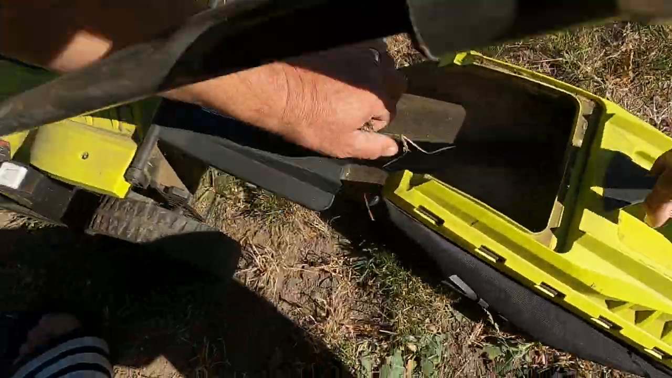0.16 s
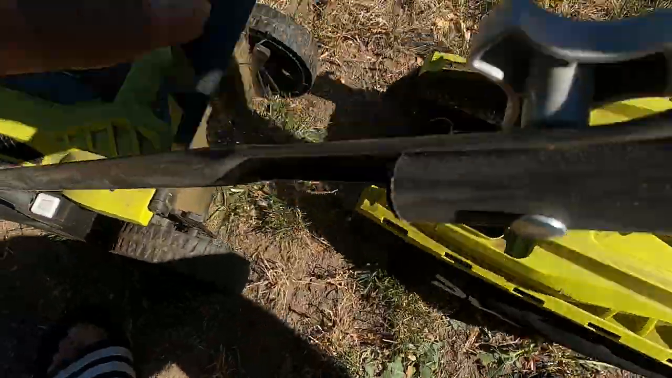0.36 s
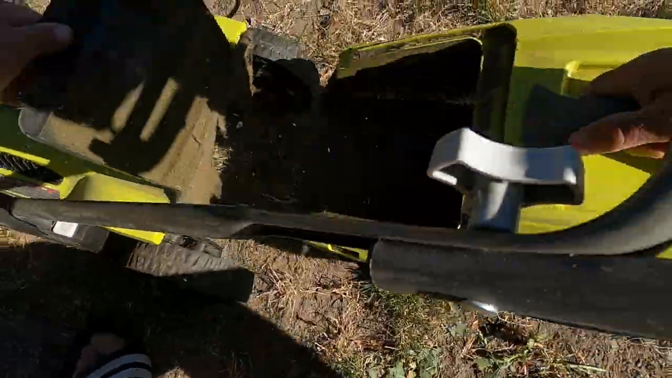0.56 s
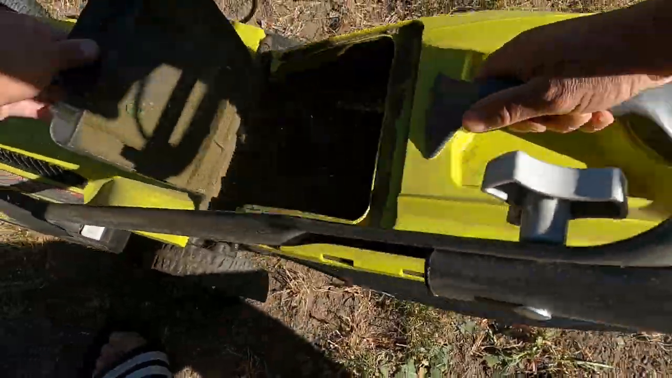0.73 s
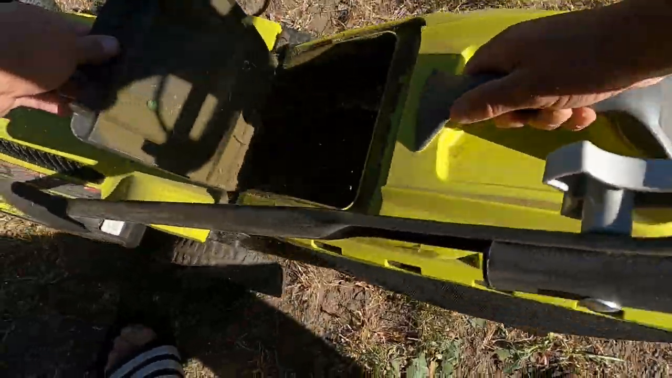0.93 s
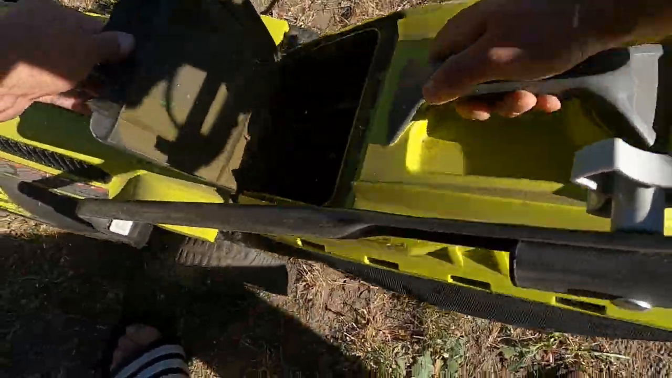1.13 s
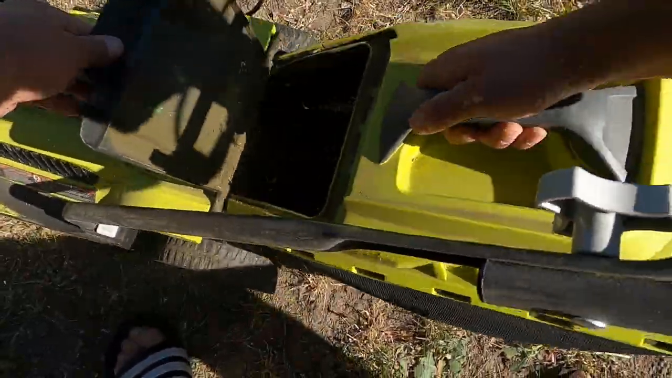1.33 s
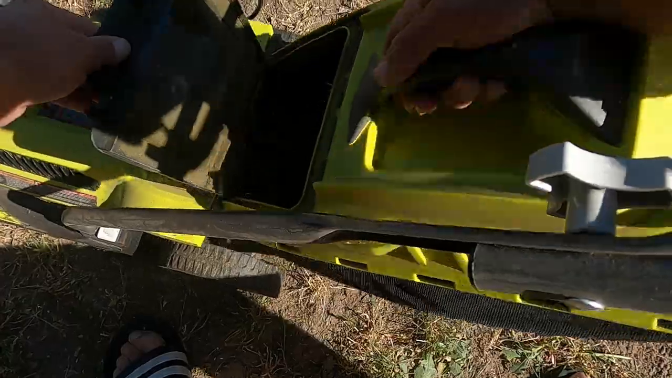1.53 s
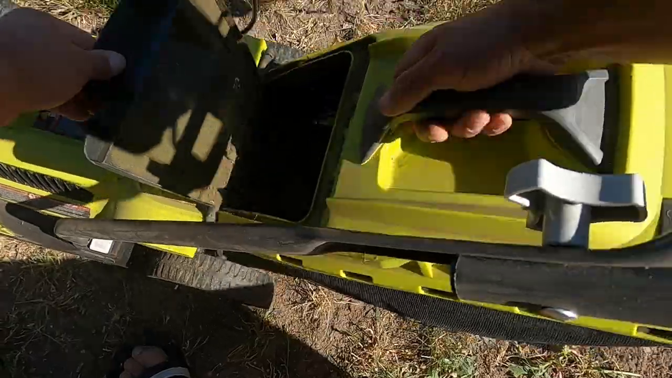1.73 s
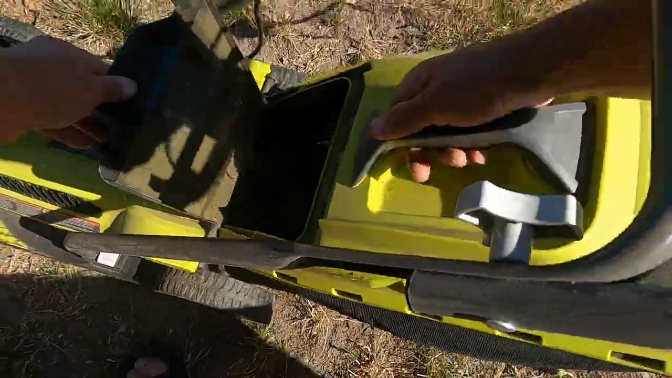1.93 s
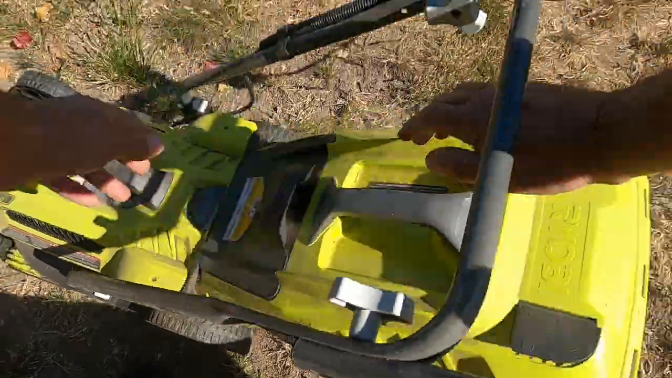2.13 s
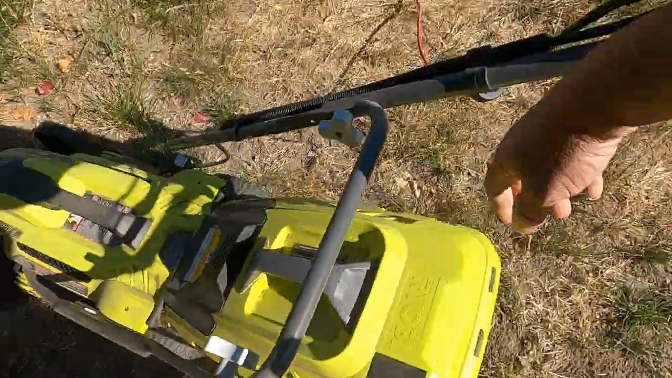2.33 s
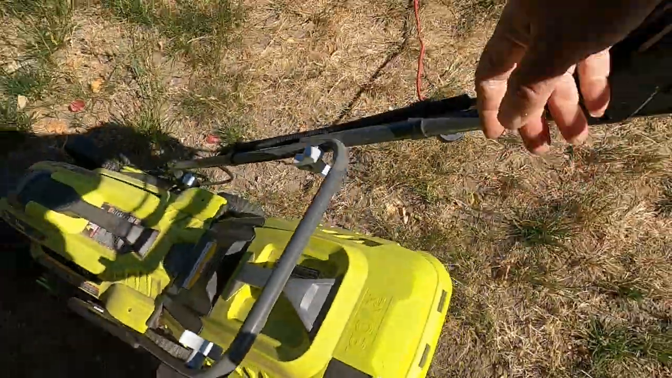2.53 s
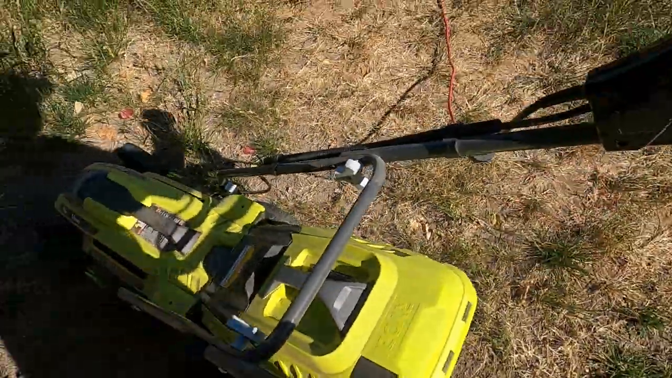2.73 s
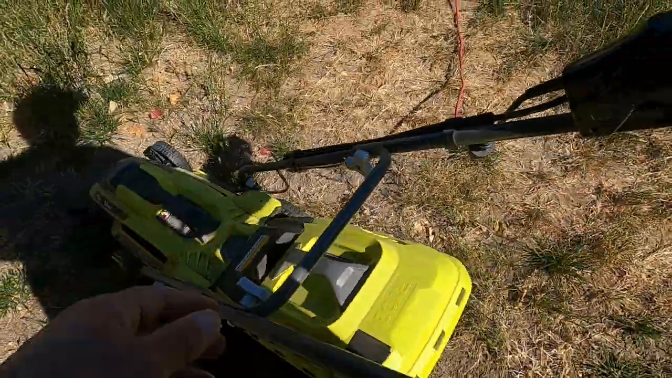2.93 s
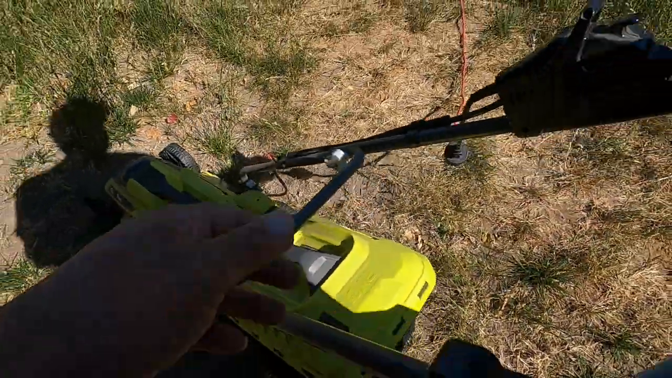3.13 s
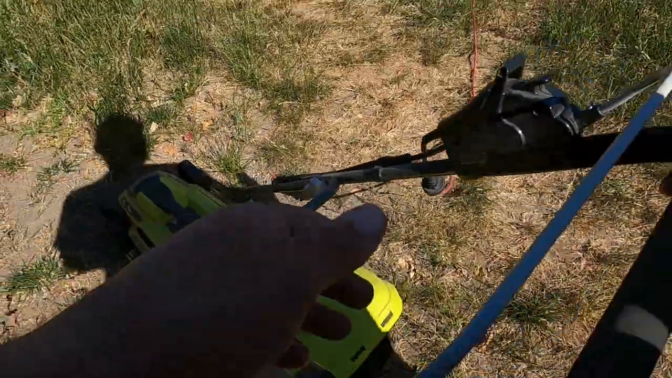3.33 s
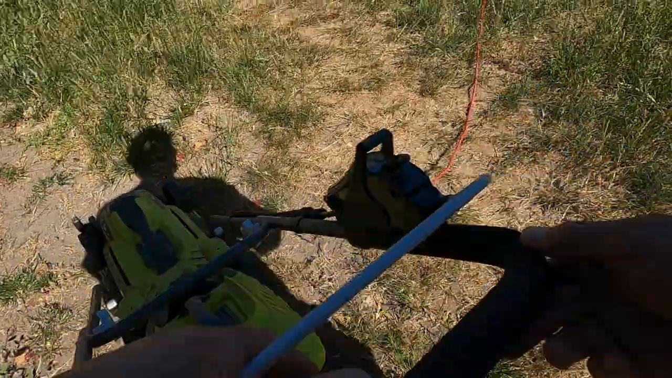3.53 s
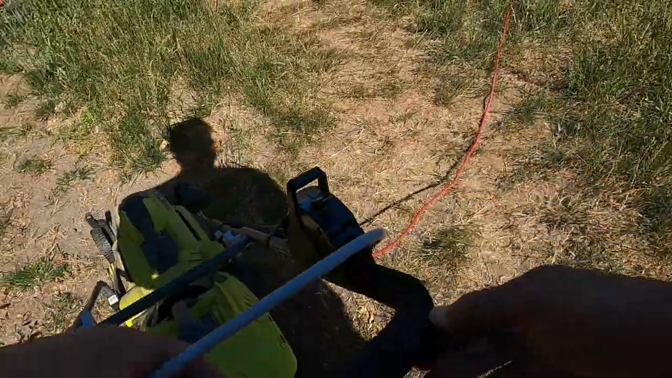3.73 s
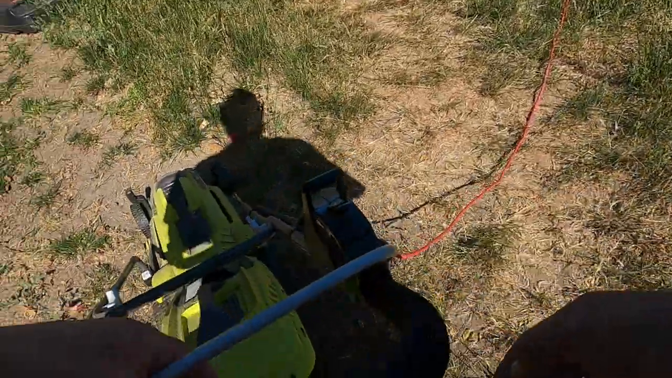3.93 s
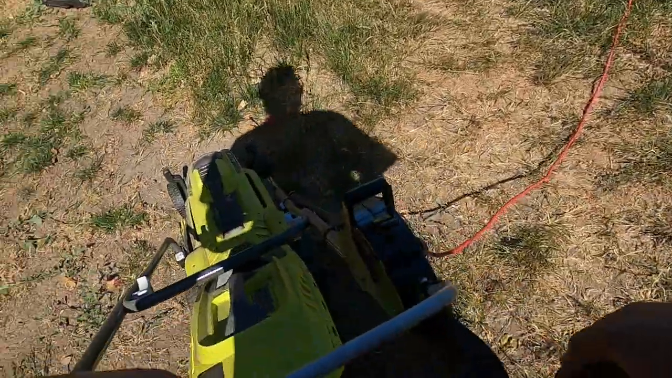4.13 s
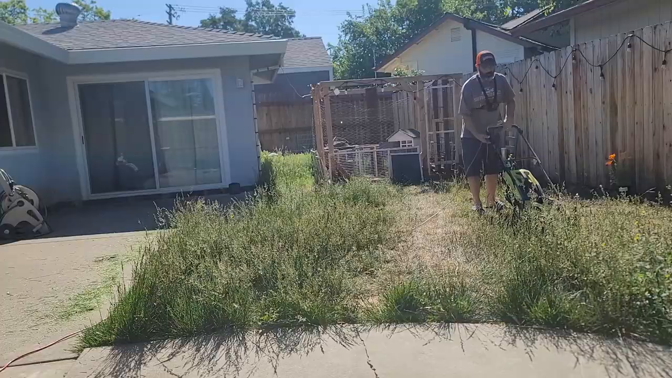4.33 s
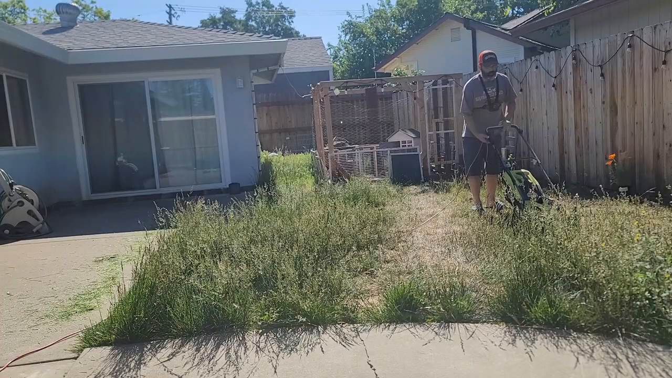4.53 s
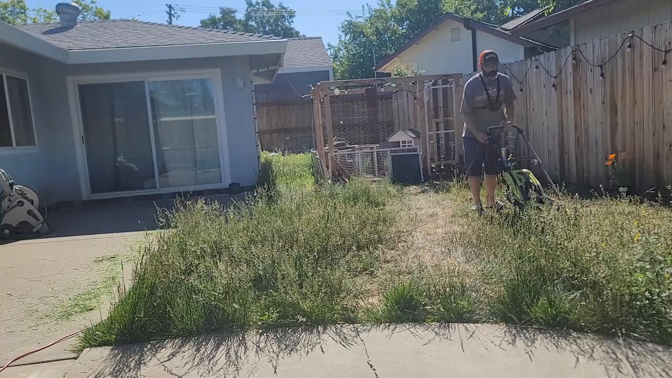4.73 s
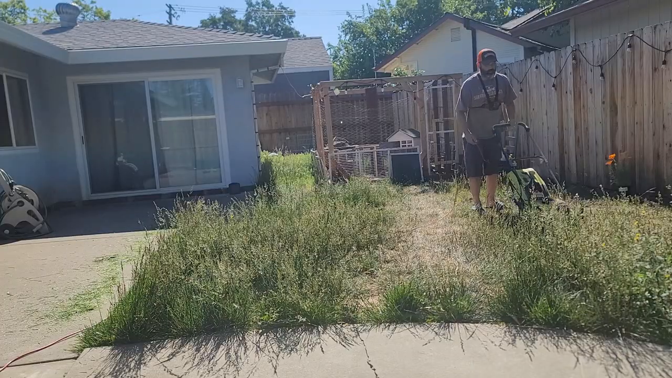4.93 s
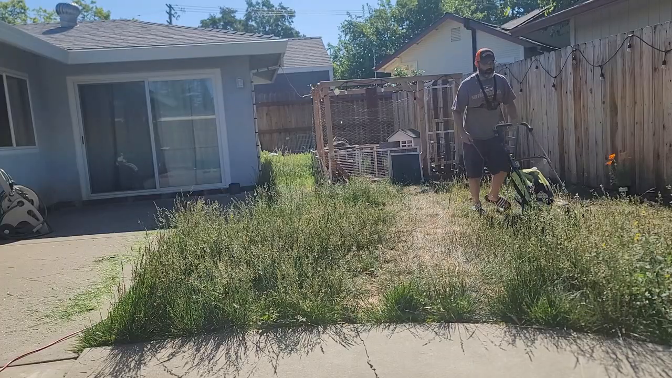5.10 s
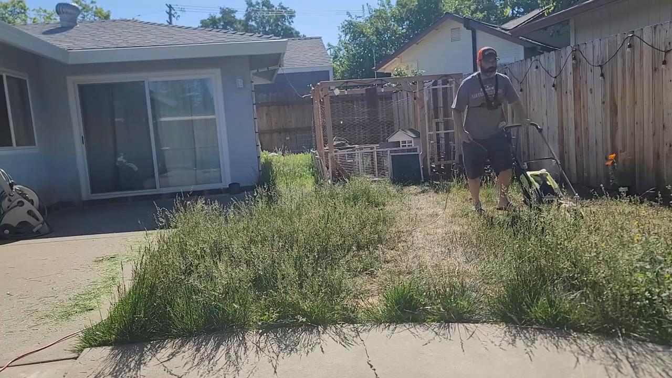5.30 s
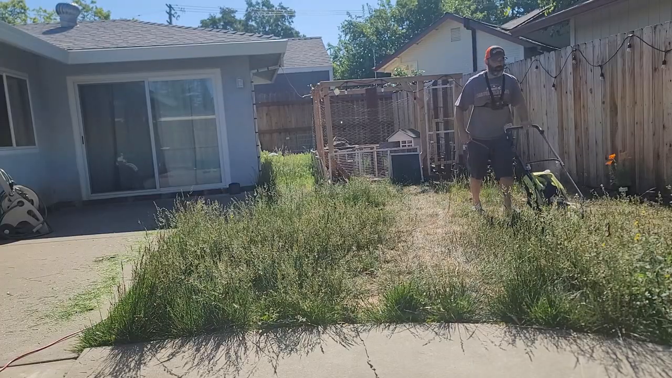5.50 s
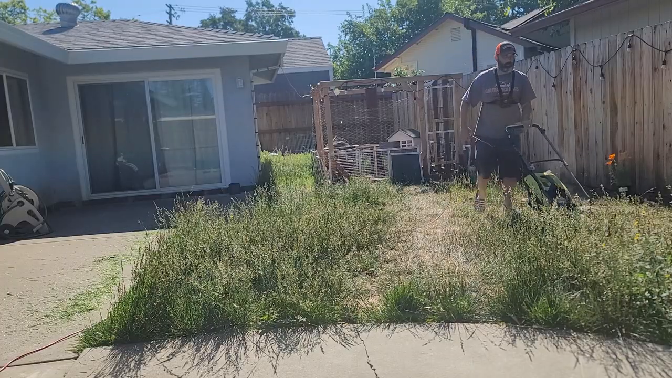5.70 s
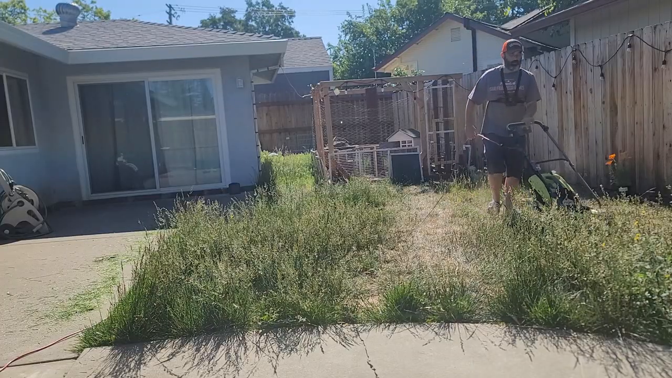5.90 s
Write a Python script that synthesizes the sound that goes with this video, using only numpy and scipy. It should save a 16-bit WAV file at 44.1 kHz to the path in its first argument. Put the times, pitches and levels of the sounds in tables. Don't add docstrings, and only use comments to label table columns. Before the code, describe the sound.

Close plastic rubbing, squeaks and boxy thuds, a hard clack, quiet rustling, then an electric mower spins up fast into a throbbing, airy drone.

```python
import sys
import numpy as np
from scipy import signal
from scipy.fft import rfft, irfft, next_fast_len
from scipy.io import wavfile
from scipy.ndimage import map_coordinates

SR = 44100
rng = np.random.default_rng(int(sys.argv[2]) if len(sys.argv) > 2 else 0)


def materialize(psi):
    bounded = np.clip(np.atleast_2d(psi).T, -1, 1)
    quanta = np.round(bounded * 32767).astype(np.int16)
    wavfile.write(sys.argv[1], SR, quanta)


def undo_db(level):
    steps = np.asarray(level, float) / 20
    return 10 ** steps


N = 262836
SWITCH_S, FULL_HZ = 4.288, 109.575

# f/Hz, density/dB
HOLLOW_AIR = [(53, -30), (90, -11), (135, 0), (387, -1), (437, -6), (484, -1.5), (700, -17), (910, -50.5),
              (1540, -120)]
# f/Hz, coherence/1
NEAR_COHERENCE = [(60, 1), (180, 0.99), (550, 0.93), (1650, 0.62), (4970, 0.4), (15000, 0.04)]


def unit(x):
    return x / np.sqrt(np.mean(x ** 2) + 1e-20)


def along(points, hz):
    f, v = np.transpose(points)
    return np.interp(np.log(hz + 1), np.log(f + 1), v)


def wobble(rate):
    knots = rng.standard_normal(int(N * rate / SR) + 4)
    return map_coordinates(knots, [np.arange(N) * rate / SR])


def between(t0, t1, fade):
    t = np.arange(N) / SR
    return np.clip(np.minimum(t - t0, t1 - t) / fade, 0, 1)


def filtered(x, response):
    m = next_fast_len(x.shape[-1] + 4096)
    spectrum = rfft(x, m) * response(np.fft.rfftfreq(m, 1 / SR))
    return irfft(spectrum, m)[..., :x.shape[-1]]


def peak(f, centre_hz, width_hz):
    return 1j * f * width_hz / (centre_hz ** 2 - f * f + 1j * f * width_hz)


def rush(spectrum, coherence, grain_db, grain_rate):
    pair = rng.standard_normal((2, N)) * undo_db(grain_db * wobble(grain_rate))

    def mid_side(hz):
        angle = np.arccos(np.clip(along(coherence, hz), -1, 1)) / 2
        return undo_db(along(spectrum, hz)) * [np.cos(angle), np.sin(angle)]

    mid, side = filtered(pair, mid_side)
    return unit(np.array([mid + side, mid - side]))


def tone(hz, smear_db, smear_rate):
    phase = 2 * np.pi * np.cumsum(hz * np.ones(N)) / SR + smear_db / 6 * wobble(smear_rate)
    return unit(undo_db(smear_db * wobble(smear_rate)) * np.sin(phase))


def whistle(centre_hz, width_hz):
    return unit(filtered(rng.standard_normal(N), lambda f: peak(f, centre_hz, width_hz) ** 2))


def place(out, s, sound):
    out[:, round(s * SR):][:, :sound.shape[1]] += sound


def yard():
    # f/Hz, density/dB
    ambient = [(20, -12), (60, -0.5), (150, -6), (400, -24), (1000, -21.5), (3000, -32.5), (8000, -64),
               (15000, -77.5)]
    drone_level = undo_db(-68) + undo_db(-58) * between(3.62, 4.35, fade=0.1)
    drone = tone(538, smear_db=1, smear_rate=24) * drone_level
    return undo_db(-49) * rush(ambient, NEAR_COHERENCE, grain_db=1.5, grain_rate=14) + drone


def swells(rows):
    s, rise, fall, db = np.transpose(rows)[:, :, None]
    t = np.arange(0, N / SR + .002, .001)
    slopes = np.maximum((s - t) / abs(rise), (t - s) / abs(fall))
    power = undo_db(2 * (db - 20 * slopes)).sum(axis=0)
    return np.interp(np.arange(N) / SR, t, 10 * np.log10(power + 1e-12))


def rubbing(over_db, bright_share):
    # t/s of the peak, rise/s, fall/s, drag level/dB, brightness/dB
    drags = [(0.0, .1, 0.19, -35.5, 5), (0.15, 0.2, 0.63, -48.5, 14.5), (0.284, 0.27, 0.82, -39, -5),
             (0.414, 0.19, 0.15, -39, 14.5), (0.514, 0.13, 0.14, -30.5, 2), (0.898, 0.11, 0.074, -26, -2),
             (1.0, 0.14, 0.15, -44.5, 5), (1.122, 0.16, 0.23, -27.5, -6.5), (1.192, .1, 0.074, -33.5, 2),
             (1.367, 0.17, 0.12, -31.5, -2), (1.571, 0.065, 0.077, -31, 5), (1.72, 0.43, 0.24, -33.5, -1),
             (2.055, 0.17, 0.39, -39.5, 4), (2.163, 0.044, 0.044, -46, 19.5), (2.23, 0.074, 0.14, -37, 8),
             (2.33, 0.33, 0.16, -44.5, 10), (2.42, .15, .3, -60, 22), (3.01, .08, .08, -56, 14),
             (.58, 0.026, .06, -50.5, 14), (.68, 0.17, 0.28, -51.5, 10.5), (2.111, .15, .08, -49.5, 19.5),
             (2.79, 0.13, 0.13, -61, 9), (2.962, .05, 0.044, -57, 18), (2.715, 0.044, 0.053, -61.5, 19),
             (2.88, 0.066, 0.12, -56, 19), (3.11, 0.31, 0.33, -50, 14.5), (3.522, 0.22, 0.14, -48, 12),
             (3.76, 0.12, 0.12, -62.5, 21), (3.693, 0.19, 0.14, -43.5, 7), (3.9, .3, 0.55, -52, -9.5),
             (4.115, 0.068, 0.068, -43.5, 21.5), (4.265, 0.3, 0.067, -48.5, 10)]
    strokes = [(s, rise, fall, db + over_db + bright_share * bright_db)
               for s, rise, fall, db, bright_db in drags]
    rest = (2, 99, 99, -69 + over_db / 2)
    return swells(strokes + [rest])


def squeaks():
    # start t/s, length/s, f/Hz, width/Hz, level/dB
    singing = [(0.441, 0.13, 900, 200, -42), (0.522, 0.15, 1042, 200, -46), (0.548, 0.21, 780, 150, -49.5),
               (.64, 0.18, 1013, 220, -53), (0.32, .18, 3440, 1000, -47.5), (.56, 0.14, 2280, 260, -53.5),
               (.67, 0.15, 2310, 330, -57), (.62, .07, 2950, 400, -53), (0.92, 0.13, 2230, 300, -63),
               (2.013, 0.14, 476.6, 150, -41.5), (2.017, 0.11, 3290, 900, -51.5),
               (2.15, 0.02, 1970, 150, -36), (2.168, 0.016, 532, 150, -25), (2.181, 0.017, 900, 200, -33),
               (2.95, 0.76, 2340, 800, -58), (3.206, 0.37, 850, 520, -54.5), (3.15, .4, 1500, 800, -64)]
    out = 0
    for s, length, hz, width_hz, db in singing:
        band = filtered(rng.standard_normal((2, N)), lambda f: 1 / (1 + (2 * f / width_hz) ** 4))
        phase = 2 * np.pi * np.cumsum(hz * (1 + .025 * wobble(12))) / SR
        voice = unit(band[0] * np.sin(phase) + band[1] * np.cos(phase))
        gate = between(s, s + length, fade=min(.022, length / 2))
        out = out + undo_db(db + 1.7 * wobble(30.03)) * voice * gate
    return out


def handling():
    # f/Hz, density/dB
    shell_spectrum = [(360, -44), (620, -9.5), (800, -6), (1050, -7), (1370, -8.5), (1700, -11.5),
                      (2200, -50), (3700, -120)]
    scrape_spectrum = [(1000, -29), (1700, -2), (2400, -2), (2850, -2), (3500, -4), (4600, -7), (6000, -44),
                       (10000, -120)]
    fizz_spectrum = [(2590, -29), (4400, -6.5), (4950, -4), (6860, -7), (8630, -10), (11500, -20.5),
                     (15800, -33.5)]
    buffet_spectrum = [(8.8, -33), (15, -2), (55, -3.5), (102, -10.5), (130, -24.5), (160, -38.5),
                       (210, -66), (350, -120)]
    # t/s of the peak, rise/s, fall/s, level/dB
    jolts = [
        (0.0, .1, .5, -51),
        (0.5, 1.6, .5, -52),
        (0.858, 0.068, 0.21, -36),
        (1.117, 0.05, 0.092, -34),
        (1.591, 0.069, 0.066, -28),
        (1.7, .1, 1.2, -54),
        (2.205, 0.055, 0.75, -34),
        (3.617, 0.05, 0.11, -27.5),
        (4.0, 1.7, 1.4, -51.5),
    ]
    hollow_db = rubbing(over_db=0, bright_share=0.05)
    shell_db = rubbing(over_db=-12.5, bright_share=0.79)
    scrape_db = rubbing(over_db=-15, bright_share=0.91)
    fizz_db = rubbing(over_db=-26.5, bright_share=1.13)
    slip = wobble(35)
    rub = undo_db(hollow_db + 0.5 + 2.0 * slip) * rush(HOLLOW_AIR, NEAR_COHERENCE, grain_db=3.5, grain_rate=60)
    rub += undo_db(shell_db - 0.3 + 1.1 * slip) * rush(shell_spectrum, NEAR_COHERENCE, grain_db=2.5, grain_rate=130)
    rub += undo_db(scrape_db - 0.2 + 1.0 * slip) * rush(scrape_spectrum, NEAR_COHERENCE, grain_db=3, grain_rate=260)
    rub += undo_db(fizz_db + 4.5 + .4 * slip) * rush(fizz_spectrum, NEAR_COHERENCE, grain_db=3.2, grain_rate=320)
    rub += squeaks()
    leeward = undo_db([[-16], [3]] * between(3.5, 3.85, fade=.08))
    buffet = rush(buffet_spectrum, [(30, 0.83)], grain_db=3.5, grain_rate=22)
    rub += undo_db(swells(jolts) + 4.0) * leeward * buffet
    return rub * between(-1, 4.33, fade=0.028)


def thuds():
    # t/s, peak level/dB, f/Hz, T60/s
    blows = [(0.0, -15, 343, 0.025), (2.206, -16, 102.6, 0.26), (0.207, -30.5, 266, 0.099),
             (0.363, -23.5, 244, 0.05), (0.389, -25, 345, 0.083), (0.472, -22, 186, 0.082),
             (0.569, -27.5, 128, 0.36), (0.819, -6.5, 252, 0.064), (0.8215, -7, 349, 0.058),
             (.8935, -6.5, 300, 0.03), (.982, -34, 300, .05), (0.874, -21, 403, 0.08),
             (0.887, -10, 181, 0.067), (0.909, -13, 148.3, 0.14), (1.049, -24, 314, 0.1),
             (1.084, -14.5, 173, 0.032), (1.115, -15.5, 226, 0.047), (1.178, -17, 142.3, 0.14),
             (1.323, -15.5, 378, 0.043), (1.358, -11, 380, 0.016), (1.382, -21.5, 268, 0.089),
             (1.552, -15, 143.5, 0.043), (1.7935, -5.5, 399, 0.018), (1.84, -15.5, 417, 0.029),
             (1.914, -25, 206, 0.059), (2.036, -23, 364, 0.035), (2.175, -19.5, 190, 0.12),
             (2.199, -6, 189, 0.04), (2.2018, -7, 285, 0.035), (2.211, -15, 175, .06),
             (2.235, -18, 230, 0.039), (2.331, -28.5, 144, 0.081), (3.648, -27.5, 152, 0.09),
             (4.303, -27, 142, 0.07), (.021, -28, 330, .06), (.145, -30, 230, .03), (.281, -26, 260, .025),
             (2.364, -33, 230, .035), (2.408, -34, 130, .04), (2.518, -38, 210, .03)]
    out = np.zeros((2, N + SR))
    t = np.arange(SR // 4) / SR
    for s, db, hz, t60 in blows:
        decay = undo_db(-60 * t / np.clip(t60, .015, .3))
        shape = decay * (1 - np.exp(-t * hz / 0.5))
        ring = np.sin(2 * np.pi * hz * t)
        ring += 0.21 * np.sin(2 * np.pi * 2.05 * hz * t)
        ring += 0.26 * np.sin(2 * np.pi * 0.543 * hz * t)
        noise = rng.standard_normal((2, len(t)))
        puff = unit(filtered(noise, lambda f: undo_db(along(HOLLOW_AIR, f))))
        blow = shape * (ring + 0.51 * puff[0] + [[.15], [-.15]] * puff[1])
        place(out, s, undo_db(db) * blow / abs(blow).max())
    return out[:, :N]


def crack(t60, own, response):
    t = np.arange(SR // 12) / SR
    noise = rng.standard_normal((3, len(t)))
    envelope = undo_db(-60 * t / max(t60, .003)) * (1 - np.exp(-t / 0.00052))
    burst = filtered(envelope * (noise[0] + own * noise[1:]), response)
    return burst / abs(burst).max()


def clicks():
    # f/Hz, width/Hz, level/dB
    panel = [(576, 61, 0), (840, 490, -24.5), (1493, 19, -5), (2600, 36, -6.5), (2630, 410, -8.5),
             (3805, 110, -1)]
    # t/s, peak level/dB, brightness/dB, T60/s
    knocks = [(0.126, -26, -30, 0.018), (0.212, -25, -29, 0.025), (0.391, -33, -14, 0.037),
              (0.412, -27, 6, 0.024), (0.569, -25.5, -6, 0.088), (0.813, -10.5, -9.5, 0.058),
              (0.871, -16.5, -28, 0.02), (0.889, -14.5, -30, 0.12), (1.117, -16, -33, 0.035),
              (1.134, -18, -27, 0.034), (1.19, -32, 9, 0.018), (1.305, -31.5, -1, 0.048),
              (1.359, -11.5, -14, 0.011), (1.381, -19, -14, 0.028), (1.549, -24, -9, 0.078),
              (1.572, -15, -2, 0.023), (1.794, -10.5, -26, 0.019), (1.841, -18, -30, 0.021),
              (1.913, -34, -30, 0.026), (2.1965, -5, -4, 0.016), (2.335, -25.5, -34, 0.031),
              (2.876, -36, -5, 0.033), (4.326, -21, -4, 0.017), (4.404, -17.5, -2, 0.093),
              (4.591, -11.5, -9, 0.04)]
    # t/s, peak level/dB, f/Hz, brightness/dB, T60/s
    latches = [(1.989, -26, 2340, 1, 0.021), (2.158, -23, 3000, 1, 0.04), (2.198, -1, 1500, -2, 0.019),
               (2.1993, -5.5, 3000, -3, 0.018), (2.199, -7, 660, -20, 0.022),
               (.894, -16.5, 1010, -18, 0.025), (1.088, -26, 900, -25, 0.02),
               (1.325, -30, 1270, -20, 0.014), (1.796, -21, 4300, -13, 0.018), (1.794, -15, 520, -30, .02),
               (1.117, -15, 1100, -15, .022), (4.592, -21, 3000, 2, .025), (2.512, -24, 1950, -1, 0.036),
               (2.516, -18, 2640, -4, 0.02), (3.06, -22.5, 1800, -28.5, 0.0079),
               (3.651, -33.5, 1110, -24, 0.034), (4.034, -38, 1410, -19, 0.024),
               (4.067, -29.5, 1110, -4, 0.24), (4.091, -20, 2770, 4, 0.051), (2.52, -36, 540, -30, .03),
               (4.592, -18, 1050, -25, .03), (.817, -11, 520, -30, .045)]
    # t/s, peak level/dB, f/Hz
    ticks = [(0.0723, -28.5, 2850), (0.1157, -34, 3600), (0.282, -32, 3520), (1.6669, -36, 2700),
             (2.833, -44, 2620), (2.946, -37.5, 1200), (4.219, -37, 4300), (4.3006, -31, 4470),
             (4.457, -27, 3700), (4.299, -33, 2200), (4.374, -29, 2800), (4.377, -31, 5000),
             (.0735, -31, 1600), (5.0385, -13, 3640), (5.5375, -18, 3760),
             (.145, -22.5, 8600), (4.232, -38, 10870), (4.376, -28, 13650), (4.666, -23, 13500),
            (4.817, -28, 9100), (4.97, -35, 12500), (5.04, -31, 8800), (5.097, -26.5, 6600),
            (5.428, -22, 6200), (5.942, -10, 14000), (2.829, -50, 10000), (2.88, -48, 9500),
            (3.111, -43, 9500), (3.135, -48, 10500), (3.178, -49, 7000), (3.219, -52, 5500),
            (3.331, -51, 9500), (4.545, -35, 7000), (5.43, -19, 5200), (5.943, -16, 6500),
             (.0463, -39, 6000), (.0692, -41, 5500), (.1052, -36, 9000), (.112, -36, 7950),
              (.135, -36, 10000), (.283, -46, 9050), (.365, -28, 3200), (.432, -22.5, 3520),
              (.5217, -46, 6000), (0.543, -32, 1500), (0.571, -36, 7000), (.6389, -46, 6000),
              (.644, -43, 7000), (.578, -37, 6500), (.586, -42, 7500), (2.171, -39, 5000),
              (2.188, -33, 6000), (2.2324, -40, 5000), (2.268, -29, 1000), (2.364, -34, 3770),
              (2.392, -50, 6500), (2.413, -50, 6740), (2.4299, -48, 8000), (2.441, -44, 7500),
              (2.4977, -46, 4950), (2.5486, -48, 5430), (2.632, -53, 4850), (2.712, -41, 2200),
              (2.716, -52, 6000), (2.833, -45, 5600), (2.8709, -51, 3600), (2.9601, -40, 4400),
              (3.1108, -45, 4530), (3.166, -52, 4000), (3.028, -47, 1800), (3.708, -41, 2600),
              (3.7489, -43, 5200), (4.676, -23, 1900), (4.716, -21, 2830), (4.892, -24, 2500),
              (5.2208, -35, 7000), (5.427, -19, 3480), (5.871, -18, 3200), (5.935, -13, 5550)]

    def wall(f):
        return sum((-1) ** k * undo_db(db / 2) * peak(f, centre_hz, 1.6 * width_hz)
                   for k, (centre_hz, width_hz, db) in enumerate(panel))

    out = np.zeros((2, N + SR))
    wall_knocks = [(s, db, 887, bright_db, t60) for s, db, bright_db, t60 in knocks]
    for s, db, hz, bright_db, t60 in wall_knocks + latches:
        body = crack(t60, 0.45, lambda f: (0.37 * wall(f) + peak(f, hz, 0.55 * hz)) * peak(f, 900, 3500) ** 2)
        snap = crack(0.8 * t60, 0.2, lambda f: peak(f, 3800, 7600) ** 3 / (1 + 1j * f / 9000) ** 2)
        hit = body + undo_db(bright_db) * snap
        place(out, s, undo_db(db) * hit / abs(hit).max())
    for s, db, hz in ticks:
        place(out, s, undo_db(db) * crack(0.0079, 0.43, lambda f: peak(f, hz, 0.78 * hz) ** 3))
    return out[:, :N]


def spin():
    slow_share, slow_s, quick_s = .7934, .3938, .132
    t = np.maximum(np.arange(N) / SR - SWITCH_S, .01)
    return FULL_HZ * (1 - slow_share * np.exp(-t / slow_s) - (1 - slow_share) * np.exp(-t / quick_s))


def passes():
    return 1.0165 * spin() - 2.1 * between(5.6, 9, fade=.11)


def airflow():
    # f/Hz, density/dB
    deck_spectrum = [(25, -23), (60, -4.5), (150, -2.5), (300, 4.5), (450, 3), (700, -5), (1000, -34.5)]
    air_spectrum = [(320, -31), (759, -4.5), (1220, -1.5), (2760, -14.5), (3810, -10.5), (6300, -19.5),
                    (7940, -30), (15600, -46.5)]
    hiss_spectrum = [(5590, -12), (9500, 1), (11800, -5.5), (14700, 9), (15700, -8)]
    # f/Hz, coherence/1
    flow_coherence = [(60, 0.94), (180, 0.96), (550, 0.81), (1650, 0.6), (4970, 0.27), (15000, 0.013)]
    speed_db = 20 * np.log10(np.maximum(spin() / FULL_HZ, .17))
    roar_db, air_db = -19 + 0.79 * speed_db, -22.5 + 1.18 * speed_db
    hiss_db = -69 + 19 * (np.arange(N) / SR - SWITCH_S)
    chop = np.sin(2 * np.pi * np.cumsum(passes()) / SR)
    roar = undo_db(roar_db - 6.0) * rush(deck_spectrum, flow_coherence, grain_db=2.0, grain_rate=30)
    air = undo_db(air_db - 1.5 + 0.77 * chop) * rush(air_spectrum, flow_coherence, grain_db=1.0, grain_rate=190)
    hiss = undo_db(hiss_db + 1.2 * chop) * rush(hiss_spectrum, flow_coherence, grain_db=1.2, grain_rate=150)
    hiss = hiss * between(4.33, 7, fade=.06)
    slack = .8 * between(4.2, 4.62, fade=.1)
    flow = roar + air
    flow = flow - slack * filtered(flow, lambda f: peak(f, 780, 420))
    return (flow + hiss * undo_db([[1.2], [-1.2]])) * between(4.298, 7, fade=0.0061)


def motor():
    orders = (45.75, 63.08, 91.5, 126.16)
    # f/Hz, level/dB
    hum_lines = [(120, -42), (240, -40), (360, -38), (480, -46)]
    # f/Hz, level/dB
    cover = [(900, -44), (1600, -38), (2100, -36), (2330, -27), (2650, -29), (2950, -26), (3120, -39),
             (3600, -35), (3950, -43), (4350, -37), (4750, -52)]
    # f/Hz, level/dB
    duct = [(2000, -55), (3300, -50), (4000, -41), (4900, -44), (5550, -46), (6050, -45), (6500, -44),
            (6800, -48)]
    # f/Hz, level/dB
    inrush = [(1500, -52), (2700, -41), (3900, -41), (5000, -42), (5700, -49), (6500, -47), (7100, -46),
              (7500, -70)]
    speed, t = spin(), np.arange(N) / SR
    bars_hz, fan_hz, double_hz, high_fan_hz = [order * speed for order in orders]
    bars_db, fan_db, double_db = along(cover, bars_hz), along(duct, fan_hz), along(inrush, double_hz)
    shake = 1 + .8 * np.sin(2 * np.pi * hum_lines[0][0] * t)
    bars = shake * undo_db(bars_db - 3) * tone(bars_hz, smear_db=2.8, smear_rate=50)
    whine = filtered(bars, lambda f: 1 + 1.8 * peak(f, 2430, 60))
    whine += undo_db(fan_db - 2) * (.6 + .4 * shake) * tone(fan_hz, smear_db=3.4, smear_rate=45)
    whine += undo_db(double_db - 3.5) * shake * tone(double_hz, smear_db=3.5, smear_rate=60)
    whine += undo_db(fan_db - 21) * tone(high_fan_hz, smear_db=3, smear_rate=80)
    whistle_db = -38 + 1.1 * np.minimum(speed - 101, 0)
    whistle_hz = 3780 + 18 * wobble(8) + 22 * np.minimum(speed - 102, 0)
    housing = tone(whistle_hz, smear_db=1.7, smear_rate=40) + .38 * whistle(3770, width_hz=130)
    whine += undo_db(whistle_db) * housing
    cover_level = undo_db(-49.5) + undo_db(-46) * between(4.53, 4.66, fade=.04)
    whine += cover_level * whistle(2460, width_hz=170)
    hum = sum(undo_db(db - 17.0 * (t - 4.5)) * tone(hz, smear_db=5.5, smear_rate=14) for hz, db in hum_lines)
    return (whine + hum) * between(4.3, 7, fade=0.052)


def throb_levels(rate):
    full_db = (-22, -22.5, -24.5, -26)
    # t/s, depth/dB, half-width/s
    cancellations = [
        [(4.68, 5, .25), (5.34, 6.5, 0.092), (5.61, 14, 0.15), (5.95, 6, 0.18)],
        [(4.68, 4, .2), (4.89, 6, 0.086), (5.33, 12.5, 0.13), (5.715, 17, 0.065), (5.95, 16, 0.11)],
        [(4.69, 26, 0.068), (5.03, 7, 0.16), (5.36, 20, 0.028), (5.68, 10, 0.29)],
        [(4.87, 28, 0.1), (5.08, 7, 0.24), (5.47, 25, 0.093), (5.67, 6, 0.1)],
    ]
    t = np.arange(N) / SR
    weak_db = 0.7 * np.minimum(rate - 77.5, 0)
    levels = []
    for db, nulls in zip(full_db, cancellations):
        lost_db = sum(depth_db * np.clip(1 - abs(t - s) / abs(half), 0, 1) for s, depth_db, half in nulls)
        levels.append(db + weak_db - lost_db)
    return levels


def blade():
    rate = passes()
    levels = throb_levels(rate)
    throb = sum(undo_db(db) * tone(k * rate, smear_db=1.2, smear_rate=10) for k, db in enumerate(levels, 1))
    upper = sum(undo_db(-38 - .7 * k) * tone((5 + k) * rate, smear_db=3.5, smear_rate=16) for k in range(9))
    halves = sum(undo_db(levels[0] - 19.5) * tone((k + .5) * rate, smear_db=4, smear_rate=12) for k in range(4))
    return (throb + upper + halves) * between(4.4, 7, fade=0.051)


def scene():
    since = np.arange(N) / SR - 2.204
    duck = undo_db(-10 * (since > 0) * np.exp(-np.abs(since) / 0.02))
    return (handling() + yard()) * duck + thuds() + clicks() + blade() + motor() + airflow()


def band_limit(x):
    return signal.sosfilt(signal.butter(12, 16940, fs=SR, output="sos"), x)


def record(dry):
    held = dry / (1 + abs(dry / 1.5) ** 6) ** (1 / 6)

    def ports(hz):
        lag = np.array([[1.2], [-1.2]]) / SR
        return np.exp(-1j * np.pi * hz * lag) * (hz < 15950)

    return band_limit(filtered(held, ports))


dry = scene()
out = record(dry)
materialize(out)
```